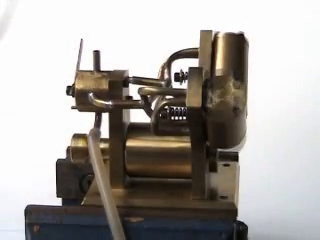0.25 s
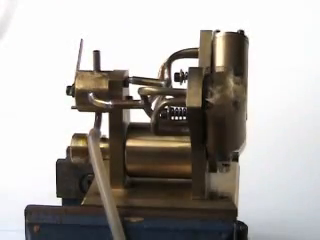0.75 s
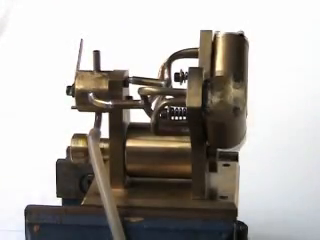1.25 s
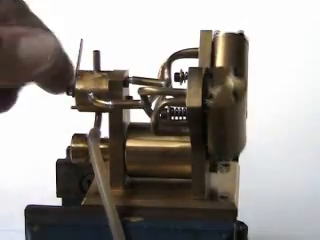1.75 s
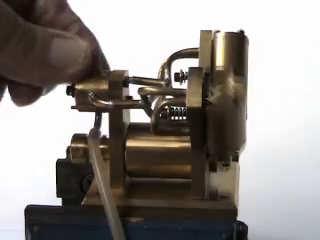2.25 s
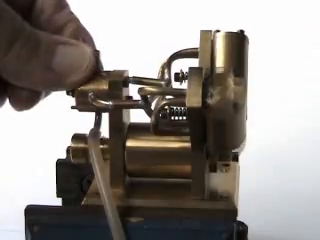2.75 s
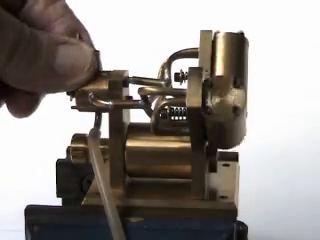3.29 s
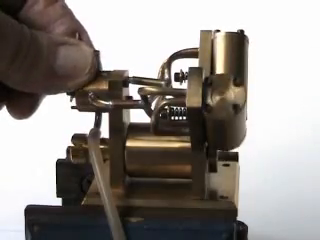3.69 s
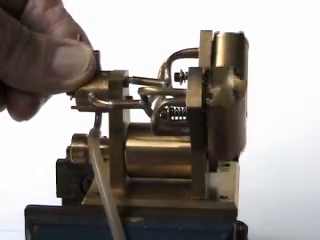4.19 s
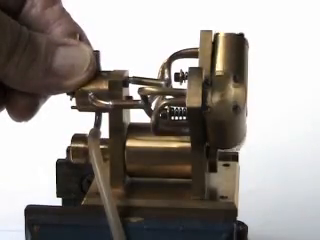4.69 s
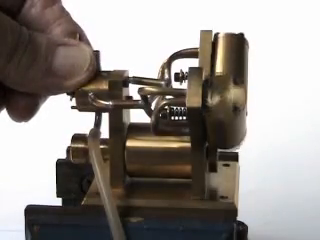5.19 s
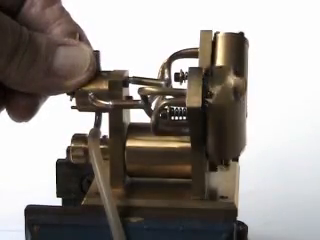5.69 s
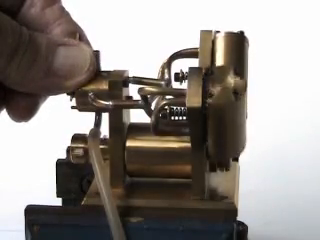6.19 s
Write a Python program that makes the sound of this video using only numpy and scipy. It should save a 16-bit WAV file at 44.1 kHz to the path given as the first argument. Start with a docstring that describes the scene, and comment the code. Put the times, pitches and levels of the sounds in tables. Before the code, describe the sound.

A miniature engine runs fast in a workshop, heard close in stereo: crisp, bright air puffs, two per turn, over a buzzy metallic clatter and hum. After about three seconds the rhythm collapses, softens and almost stops, leaving a leaking hiss. A short whistling swell leads into a sudden restart, which gradually slows to distinct chuffs and solid clunks. Low steady room rumble continues throughout.

```python
"""In a workshop, two microphones stand close to a small double-acting model engine on compressed air, over a dull rumble.
At first it runs fast: each turn gives two hissing puffs, a splutter and bearing knocks, and the base hums.
The engine eases off, then a hand throttles the valve: it slows and stalls while air leaks out.
A faint whistle swells as the valve opens again; the engine surges back and slows to an amble with heavy clunks.
Noise shaped by crank angle makes the air; decaying sines and filtered noise make the blows on the metal."""
import sys
import numpy as np
from scipy import signal
from scipy.fft import rfft, irfft, next_fast_len
from scipy.io import wavfile
from scipy.ndimage import uniform_filter1d, map_coordinates

SR = 44100
rng = np.random.default_rng(int(sys.argv[2]) if len(sys.argv) > 2 else 0)


def bounce(signal):
    """Save signal as a 16-bit WAV file at the path given by the first command-line argument."""
    frames = np.transpose(np.atleast_2d(signal))
    limited = np.clip(frames, -1, 1)
    pcm = np.round(limited * 32767).astype(np.int16)
    wavfile.write(sys.argv[1], SR, pcm)


N = 284004


def amp(db):
    """Decibels to gain."""
    return 10 ** (np.asarray(db) / 20)


def unit(x):
    """x at rms 1."""
    return x / np.sqrt(np.mean(x ** 2) + 1e-20)


def along(points, hz):
    """(Hz, value) points read on a log frequency axis."""
    f, v = np.transpose(points)
    return np.interp(np.log(hz + 1), np.log(f + 1), v)


def curves(rows):
    """One value per sample for each column after the time."""
    seconds, *columns = np.transpose(rows)
    return [np.interp(np.arange(N) / SR, seconds, column) for column in columns]


def wobble(rate):
    """A smooth random curve, rate knots a second."""
    knots = rng.standard_normal(int(N * rate / SR) + 4)
    return map_coordinates(knots, [np.arange(N) * rate / SR])


def filtered(x, response):
    """x shaped by a response of frequency in Hz."""
    n = x.shape[-1]
    m = next_fast_len(n + 8192)
    return irfft(rfft(x, m) * response(np.fft.rfftfreq(m, 1 / SR)), m)[..., :n]


def hump(hz, centre, octaves):
    """A bell on the log-frequency axis."""
    return np.exp(-.5 * (np.log2((hz + 1) / centre) / octaves) ** 2)


def band(centre, octaves):
    """Noise of rms 1 in a bell-shaped band."""
    return unit(filtered(rng.standard_normal(N), lambda hz: hump(hz, centre, octaves)))


def lifts(table, hz):
    """The summed dB of (Hz, width, dB) resonances and hollows."""
    return sum(db / (1 + (2 * (hz - f) / width) ** 2) for f, width, db in table)


def passes(turns, angle):
    """The samples at which the crank passes an angle."""
    return np.flatnonzero(np.diff(np.floor(turns - angle)) > 0)


def strength(law, shut):
    """The level in dB of a sound that fades as the valve shuts."""
    full_db, lost_db, bend = law
    return full_db - lost_db * shut ** abs(bend)


def impact(law, speed):
    """The level in dB of blows that weaken as the crank slows."""
    full_db, halving_db = law
    return full_db + halving_db * np.log2(speed / speed.max())


# Spectrum of the background rumble. Each row: frequency in Hz, relative level in dB.
ROOM_TONE = [(20, -16), (35, -16), (47, -5), (57, 2.5), (72, -2), (100, -2.5), (126, -5), (206, -10.5),
             (455, -20), (700, -19), (1100, -24), (2200, -20), (3250, -30), (5500, -120)]


def room_tone(level_db=-51, lead_rad=1.73):
    """A dull, steady background rumble; the bass reaches the two microphones out of step."""
    noise = rng.standard_normal((2, N))
    shared, apart = unit(filtered(noise, lambda hz: amp(along(ROOM_TONE, hz))))
    sides = np.array([[1], [-1]])
    pair = shared + amp(-10) * sides * apart
    # the phase lead is split between the sides and shrinks above the bass
    pair = filtered(pair, lambda hz: np.exp(.5j * sides * lead_rad / (1 + (hz / 160) ** 2)))
    balance_db = [[-1.5], [1.2]]
    return amp(level_db) * pair * amp(balance_db)


# Decay of the workshop's echo. Each row: frequency in Hz, time to fall 60 dB in seconds.
WORKSHOP = [(200, 0.9), (2000, 0.21), (9000, 0.52)]


def workshop(x):
    """The walls answer 4 ms later with decaying noise, different at each microphone."""
    hz, t, z = signal.stft(rng.standard_normal((2, SR // 3)), SR, nperseg=256)
    decay = amp(-60 * t / along(WORKSHOP, hz)[:, None])
    tail = signal.istft(z * decay, SR, nperseg=256)[1]
    tail = tail / np.linalg.norm(tail[0])
    delayed = np.pad(x, (SR // 250, 0))
    return signal.fftconvolve(delayed[None], tail, axes=1)[:, :N]


# Level of the stereo side signal. Each row: frequency in Hz, level in dB against the direct sound.
SPREAD = [(150, -10), (260, -9.5), (400, -17.5), (600, -42), (950, -20), (1500, -29), (2350, -10.5),
          (3700, -42), (5900, -68.5), (9000, -21)]


def stereo(x, delay_s=.0011):
    """A stereo side signal, made from the direct sound: added on the left, subtracted on the right."""
    def side_response(hz):
        delay = delay_s * hz / (hz + 1500)  # grows with frequency
        return amp(along(SPREAD, hz)) * 1j * np.exp(-2j * np.pi * hz * delay)
    side = filtered(x, side_response)
    return np.array([x + side, x - side])


# Stand and bench, colouring the lower sounds. Each row: frequency in Hz, width in Hz, lift in dB.
BENCH = [(150, 30, -7), (174, 14, 4), (198, 16, -2), (265, 14, 3), (283, 16, -3), (316, 24, 2),
         (350, 24, 4), (410, 26, 2), (497, 36, -6), (546, 18, 1.5), (580, 18, -2), (622, 20, 3),
         (653, 22, 2), (688, 16, 2), (720, 22, -5), (746, 18, 3), (772, 16, -3), (820, 22, 5),
         (846, 28, -8), (885, 26, 3.5), (918, 24, 3), (949, 14, 4), (975, 24, -6), (1004, 18, 2),
         (1043, 16, 2), (1098, 36, -7)]


def on_bench(x):
    """The bench's colour, made causal (minimum phase) so that its resonances ring after each blow."""
    m = 2 * next_fast_len(N // 2 + SR // 4)
    log_gain = lifts(BENCH, np.fft.rfftfreq(m, 1 / SR)) * np.log(10) / 20
    cepstrum = irfft(log_gain)
    # folding the cepstrum onto positive times gives the causal phase
    cepstrum[1:m // 2] *= 2
    cepstrum[m // 2 + 1:] = 0
    return irfft(rfft(x, m) * np.exp(rfft(cepstrum)))[:N]


# The crankshaft runs free, is throttled to a stall, restarts and settles.
# Each row: time in seconds, speed in turns a second.
SPEED = [(0, 15.2), (.25, 15.2), (.76, 14.99), (1.1, 14.865), (1.7, 14.635), (2.2, 14.335), (3.01, 13.97),
         (3.19, 11.732), (3.58, 4.061), (3.75, 3.594), (3.77, .372), (4.06, .063), (4.2, 8.88),
         (4.45, 10.364), (4.69, 8.934), (5.36, 7.055), (5.67, 6.399), (6.44, 5.872)]
START_ANGLE = -.462  # where the crank stands at first, in turns


def crankshaft():
    """The speed in turns a second, and its running sum: the crank angle in turns."""
    speed, = curves(SPEED)
    return speed, START_ANGLE + np.cumsum(speed) / SR


def haste(turns, slow=7.1, full=16.7):
    """0 when the engine ambles, rising to 1 at full haste; slow and full are turns a second."""
    speed = uniform_filter1d(np.gradient(turns) * SR, SR // 5)
    return np.clip((speed - slow) / (full - slow), 0, 1)


# The crank creeps over dead centre on the last of the air, then the valve snaps open ahead of the flywheel.
# In order: restart in seconds, creep before it in seconds, surge after it in seconds,
# speed that the surge would hold in turns a second.
RESTART = (4.153, 0.072, .3, 10)


def throttling(speed):
    """0 with full air, 1 with the valve shut; the air goes with the speed, except around the restart."""
    restart_s, creep, surge, held = RESTART
    t = np.arange(N) / SR - restart_s
    surging = (t > 0) & (t < surge)
    creeping = (t > -creep) & (t <= 0)
    air = np.maximum(speed, held * surging)
    air = np.where(creeping, np.interp(-creep, t, speed), air)
    return 1 - air / speed.max()


# Low modes of the base. Each row: frequency in Hz, relative level in dB, time to fall 60 dB in seconds,
# extra boom at the critical speed in dB.
BASE = [(170.5, -6, 0.35, 0), (213, -7, 0.4, 9), (252, -2, 0.1, 0), (317.5, -2.5, 0.35, 8),
        (348.5, -3.5, 0.4, 9.5)]
# Narrow range of speed in which the base booms. In order: centre and width, both in turns a second.
CRITICAL_SPEED = (15.17, .125)
# Strength of the shaking. In order: level at top speed in dB, dB lost with each halving of the speed.
SHAKING = (-51, 5)


def drone(turns, speed, push=0.201, pull=0.59):
    """The piston pushes and pulls the base once a turn; the hum swells where the beat suits a mode."""
    t = np.arange(SR // 2) / SR
    kicks, out = np.zeros(N), np.zeros(N)
    kicks[passes(turns, push)] = 1
    kicks[passes(turns, pull)] = -1
    centre, width = CRITICAL_SPEED
    near = np.exp(-.5 * ((speed - centre) / width) ** 2)
    onset = 1 - np.exp(-t / 0.0078)
    for hz, db, t60, boom_db in BASE:
        ring = amp(-60 * t / t60) * np.sin(2 * np.pi * hz * t) * onset
        hum = unit(signal.fftconvolve(kicks, ring)[:N])
        out += amp(db + boom_db * near) * hum
    return amp(impact(SHAKING, speed)) * out


# The stalled port, faintly heard as the valve opens again. In order: time of the peak in seconds,
# peak level in dB, swell in dB a second, release in dB a second.
WHISTLE = (4.11, -42.5, 75, 600)


def whistle(centre_hz=2980, octaves=0.17):
    """A narrow band of hiss from the barely open port swells, and is cut off as the crank moves on."""
    peak_s, peak_db, swell, release = WHISTLE
    t = np.arange(N) / SR - peak_s
    level_db = peak_db + np.minimum(swell * t, -release * t)
    return amp(level_db) * band(centre_hz, octaves)


# Heavier clunks of the crank pin at low speed. Each row: start in seconds, level in dB.
CLUNKS = [(3.377, -29), (4.656, -35), (4.774, -30), (4.891, -26.5), (5.009, -27), (5.135, -29),
          (5.27, -27.5)]
# What the crank pin rings with. Each row: frequency in Hz, relative level in dB, time to fall 60 dB in seconds.
PIN = [(404, -5, 0.07), (625, -6, 0.055), (655, 0, 0.07), (690, -5, 0.055), (912, -9, 0.05)]


def clunks():
    """The crank pin falls across its play and rings at slightly new strengths each time."""
    t, out = np.arange(SR // 5) / SR, np.zeros(N)
    onset = 1 - np.exp(-t / 0.0052)
    for start_s, db in CLUNKS:
        ring = np.zeros(len(t))
        for hz, level, t60 in PIN:
            decay_db = level + rng.normal(0, 1) - 60 * t / t60
            ring += amp(decay_db) * np.sin(2 * np.pi * hz * t)
        out[round(start_s * SR):][:len(t)] += amp(db) * ring * onset
    return out


# Play in the bearings, taken up at fixed crank angles. Each row: share of a turn, pitch of the contact in Hz,
# relative level in dB when slow, at half speed and at full speed.
KNOCKS = [(.08, 350, -8, -4, -6), (.18, 330, -16, -16, -4), (.2, 640, -14, -13, -8), (.285, 900, 0, -4, -1),
          (.32, 220, -12, -14, 3), (.33, 410, -6, -4, 1), (.36, 420, 4, -10, -12), (.385, 900, -3, -5, -4),
          (.43, 640, -13, -12, -8), (.54, 900, -2, -5, -20), (.61, 360, -5, 0, -6),
          (.62, 660, -10, -7, -18), (.68, 360, -7, -10, -3), (.85, 380, -3, -5, -9), (.85, 880, -3, -5, -3),
          (.87, 640, -7.5, -5, -14), (.96, 640, -12, -10, -3.5)]
# Slow, half and full speed, in turns a second.
PACES = (6.6, 8.6, 14)
# Modes of the brass frame. Each row: frequency in Hz, relative level in dB, time to fall 60 dB in seconds.
FRAME = [(176, -0.5, 0.023), (246, -9, 0.044), (315, -0.5, 0.028), (340, -2, 0.027), (400, -11, 0.032),
         (468, -6, 0.012), (542, -16, 0.02), (646, 2, 0.047), (706, -5, 0.039), (808, -3, 0.054),
         (897, 5, 0.033), (1154, -4.5, 0.047)]
# Strength of the knocks, before a 0.5 dB lift. In order: level at top speed in dB,
# dB lost with each halving of the speed.
KNOCKING = (-38.5, 5.1)


def knock(pitch, rattle_db=-5, rattle_t60=0.055, attack_s=0.0065):
    """One contact rings the frame modes near its pitch and sets the small parts clattering."""
    t = np.arange(SR // 5) / SR
    ring = np.zeros(len(t))
    for hz, db, t60 in FRAME:
        driven = amp(db - 60 * t / t60) * hump(hz, pitch, octaves=0.51)
        ring += driven * np.sin(2 * np.pi * hz * t)
    noise = rng.standard_normal(len(t))
    clatter = filtered(noise, lambda hz: hump(hz, pitch * 1.1, octaves=0.46)) * amp(-60 * t / rattle_t60)
    return (unit(ring) + amp(rattle_db) * unit(clatter)) * (1 - np.exp(-t / attack_s))


def knocking(turns, speed, scatter_db=0.1, scatter_s=.00009):
    """Each bearing knocks the frame in nearly the same way every turn, so the rings merge into a buzz."""
    out = np.zeros(N)
    for angle, pitch, *pace_db in KNOCKS:
        blow = knock(pitch)
        at, hits = passes(turns, angle), np.zeros(N)
        late = rng.normal(0, scatter_s * SR, len(at)).astype(int)
        level_db = np.interp(speed[at], PACES, pace_db) + rng.normal(0, scatter_db, len(at))
        hits[np.clip(at + late, 0, N - 1)] = amp(level_db)
        out += signal.fftconvolve(hits, blow)[:N]
    return amp(impact(KNOCKING, speed) + 0.5) * unit(out)


# Level of the splutter, before a 7 dB cut. Each row: time in seconds, level in dB.
SPLUTTER_DB = [(0, -40), (2.2, -34), (3.1, -34), (3.25, -45), (3.47, -42), (3.63, -37.5), (4.19, -30.5),
               (4.6, -41), (4.95, -39), (5.35, -33), (6.3, -35)]


def splutter(turns, angle=0.2695, sweep=0.051, start_hz=2050, end_hz=880, life=0.033):
    """In mid stroke the air splutters once, a broad burst that fills out downwards as the crank moves on."""
    out = np.zeros(N)
    # five overlapping bursts; angle, sweep and life are shares of a turn
    for u in np.linspace(0, 1, num=5):
        age = (turns - angle - sweep * u) % 1 / life
        centre_hz = start_hz * (end_hz / start_hz) ** u
        out += age * np.exp(1 - age) * band(centre_hz, octaves=0.37)
    level_db, = curves(SPLUTTER_DB)
    grain_db = 1.5 * wobble(600)
    return amp(level_db - 7) * out * amp(grain_db)


def port(turns, opens, closes, opening, closing):
    """How far a port is uncovered; all four settings are shares of a turn."""
    middle = (opens + closes) / 2
    angle = (turns - middle + .5) % 1 + middle - .5
    return np.clip(np.minimum((angle - opens) / opening, (closes - angle) / closing), 0, 1)


# Tone of the exhaust jets. Each row: frequency in Hz, then relative levels in dB of the first and the second port
# at full haste, and of the first and the second port when slow.
JETS = [(100, -10, -31, -19, -27), (350, -10.5, -14, -2.5, -4), (1020, -1.5, -4.5, -13, -6.5),
        (1560, -3.5, -5, -8, -11.5), (2510, -5.5, -6.5, -10, -15.5), (3030, -7.5, 5, -7, -7),
        (3980, -6, -2, -1.5, -2), (4500, -8.5, -1, -5, -2.5), (5500, -2.5, 0.5, -1.5, -2),
        (6160, -9, 0, 1.5, 0), (7090, -5, 3.5, -6.5, -5.5), (7650, 4.5, 1.5, -4, -4.5),
        (8200, -11.5, 1, -6, -5.5), (10800, -6, 0.5, -4.5, -2.5)]
# Resonances of the ports and pipes. Each row: frequency in Hz, width in Hz, lift in dB.
PIPES = [(1700, 230, 2.5), (2217, 230, 5.5), (2835, 75, 6), (3063, 130, 5.5), (3260, 110, 6),
         (3360, 110, 4.5), (3496, 60, 4), (4107, 80, 4), (4465, 110, 5.5), (4735, 110, 6), (5594, 110, 6),
         (5879, 80, 5), (6494, 130, 2.5), (7120, 60, 3), (7431, 70, 4), (8400, 220, 3), (9650, 220, 3.5)]


def jet(fast, axis):
    """Turbulent air from one port, coloured by the pipes; its tone shifts with the speed."""
    table, air = np.array(JETS), rng.standard_normal(N)

    def toned(column):
        tone = table[:, [0, column]]
        return unit(filtered(air, lambda hz: amp(along(tone, hz) + lifts(PIPES, hz)) * (hz > 130)))
    hard, gentle = toned(axis), toned(axis + 2)
    return fast * hard + (1 - fast) * gentle


def thinned(air, speed):
    """With the crank nearly at rest the air only seeps through a slit, and its hiss loses its body."""
    seeping = np.interp(speed, (4.2, 5.7), (.6, 0))
    body = filtered(air, lambda hz: 1 / (1 + (hz / 2300) ** 8))
    return air - seeping * body


# How each port fades as the air is throttled; all exhaust levels come before a 0.5 dB lift.
# In order: level at full air in dB, dB lost with the valve shut, bend of the fall (an exponent).
FIRST_PORT = (-24, 20, 1.64)
SECOND_PORT = (-24, 11.5, 1.6)
# The first port's shrill band, fading once the hand is on the valve. Each row: time in seconds, level in dB.
SHRILL = [(0, -28), (.7, -26.5), (1.5, -29.5), (2.07, -25.5), (2.27, -32), (2.8, -29.5), (3.2, -36),
          (3.5, -60)]
# Hiss that flares briefly at fixed crank angles. Each row: share of a turn, length in turns, centre in Hz,
# width in octaves, level at full haste in dB.
FLARES = [(.1, .02, 2000, .55, -33.5), (.32, .065, 3280, .06, -29.5), (.49, .012, 1350, .3, -39),
          (.65, .02, 1700, .45, -40)]


def exhaust(turns, fast, shut, leak_db=-10.5, uneven_db=0.5):
    """The two ports blow in turn, the first with a shrill edge, and a little air leaks between the puffs."""
    first = port(turns, opens=0.027, closes=0.515 - 0.089 * fast, opening=0.13, closing=0.099)
    second = port(turns, opens=.57, closes=1.005, opening=.06, closing=.125)
    leak = amp(leak_db)
    puffs = amp(strength(FIRST_PORT, shut)) * np.hypot(first, leak) * jet(fast, axis=1)
    puffs = puffs + amp(strength(SECOND_PORT, shut)) * np.hypot(second, leak) * jet(fast, axis=2)
    shrill_db, = curves(SHRILL)
    edge = port(turns, opens=0.022, closes=0.46, opening=0.14, closing=0.18)
    puffs = puffs + amp(shrill_db) * edge * band(6050, octaves=0.17)
    for angle, length, hz, octaves, db in FLARES:
        flare = np.exp(-.5 * ((turns % 1 - angle) / length) ** 2)
        puffs = puffs + amp(db) * fast * flare * band(hz, octaves)
    flutter_db = .7 * wobble(500)
    return puffs * amp(uneven_db * wobble(25) + flutter_db + 0.5)


def scene(air_wet_db=-20, works_wet_db=-14):
    """The crank drives the puffs, splutter, knocks and drone, straight ahead of the microphones."""
    speed, turns = crankshaft()
    fast, shut = haste(turns), throttling(speed)
    air = on_bench(thinned(exhaust(turns, fast, shut), speed)) + whistle()
    works = on_bench(splutter(turns) + knocking(turns, speed))
    works = works + drone(turns, speed) + clunks()
    walls = workshop(amp(air_wet_db) * air + amp(works_wet_db) * works)
    return stereo(air + works) + walls + room_tone()


TOP_HZ = 9990  # upper band limit


def record(dry):
    """The microphones' channel falls away very steeply above its band limit."""
    return filtered(dry, lambda hz: 1 / np.sqrt(1 + np.minimum(hz / TOP_HZ, 2) ** 300))


dry = scene()
out = record(dry)
bounce(out)
```